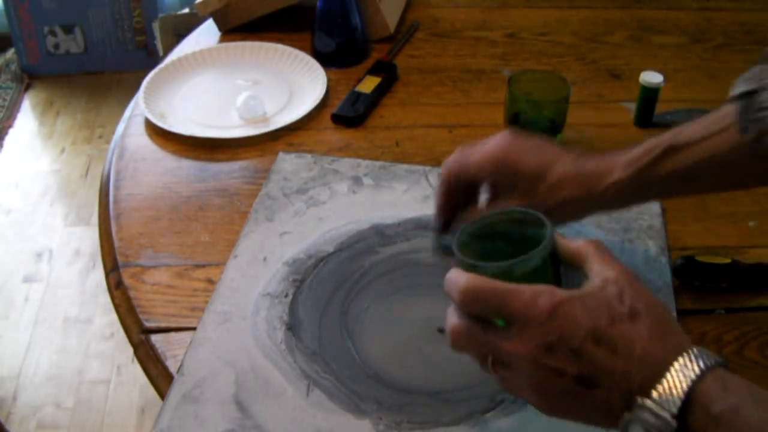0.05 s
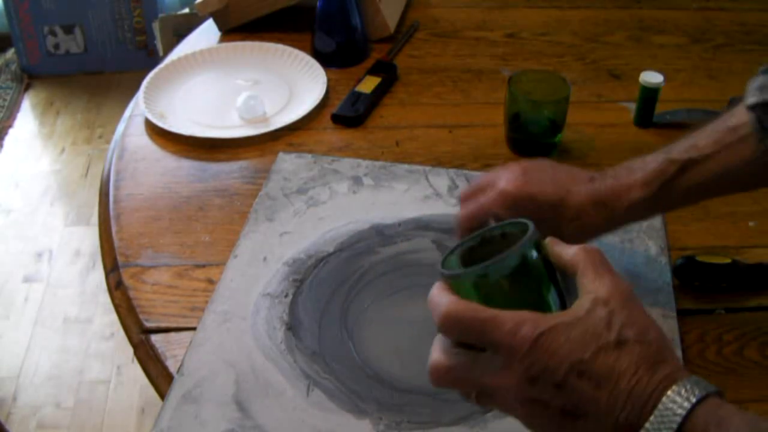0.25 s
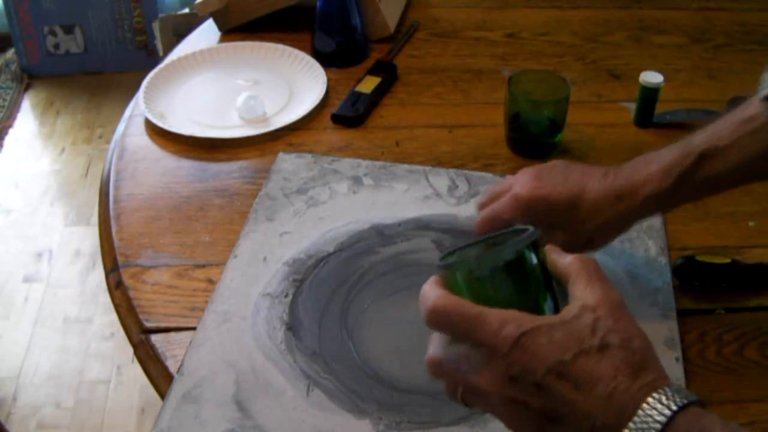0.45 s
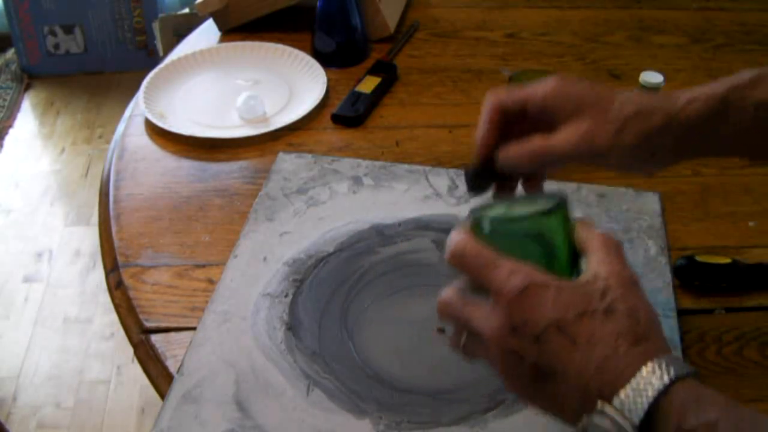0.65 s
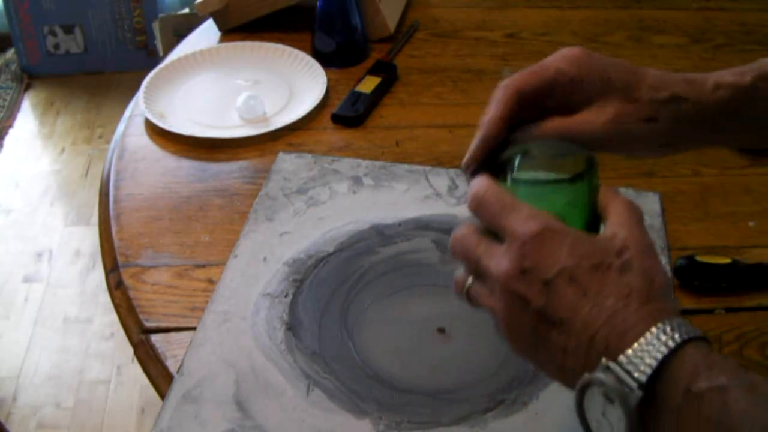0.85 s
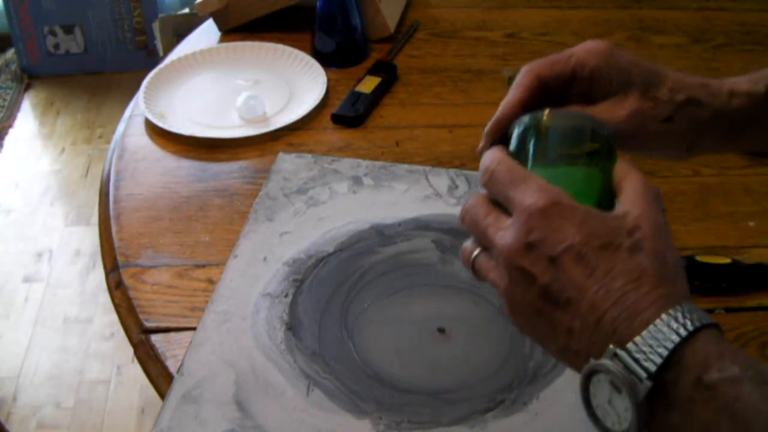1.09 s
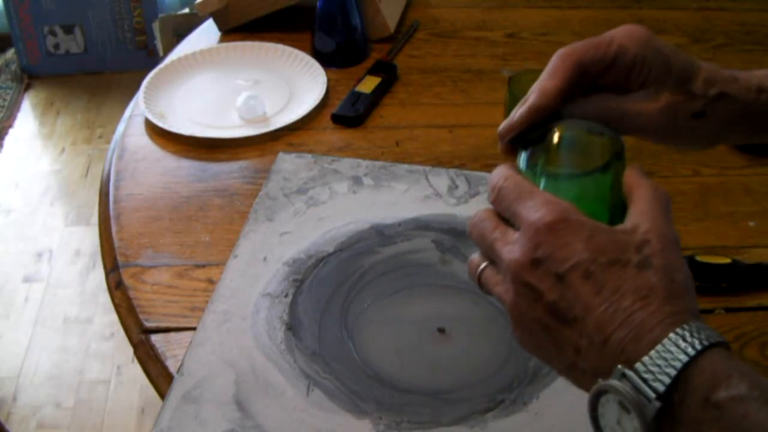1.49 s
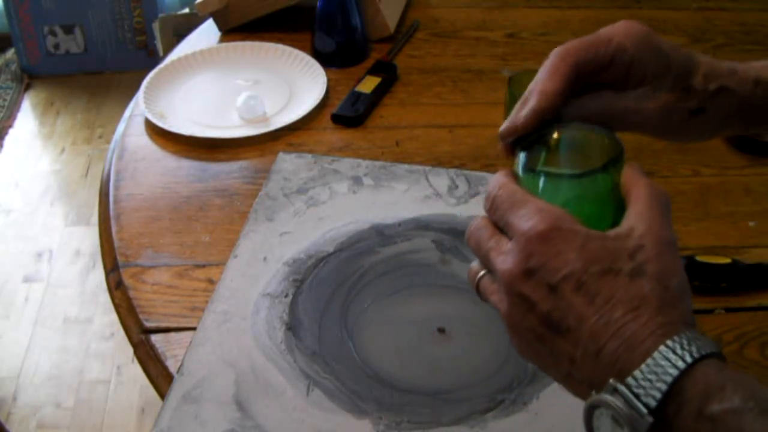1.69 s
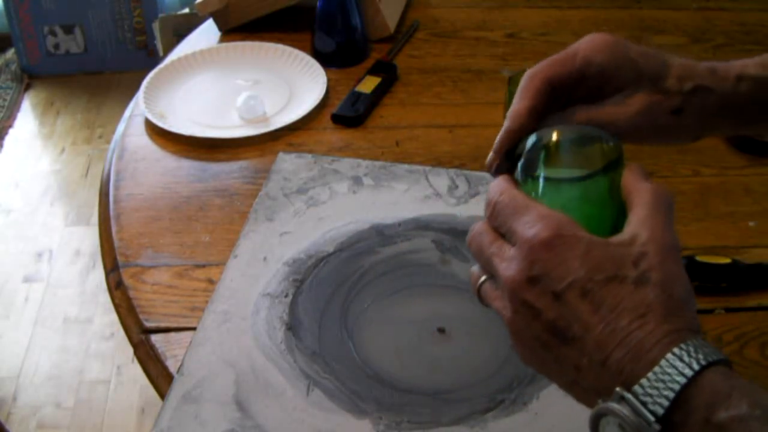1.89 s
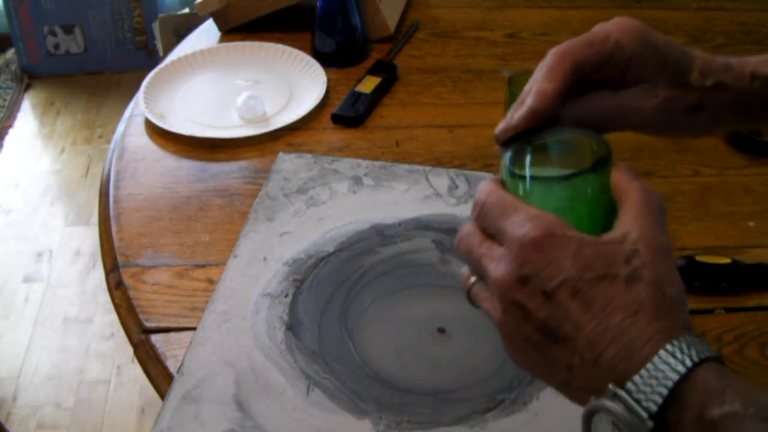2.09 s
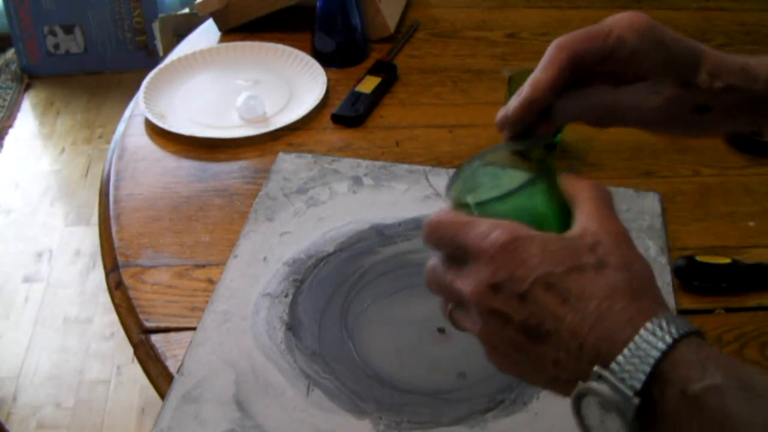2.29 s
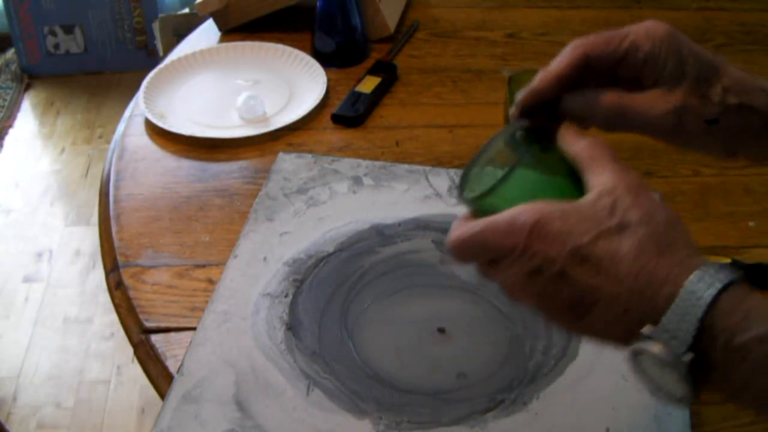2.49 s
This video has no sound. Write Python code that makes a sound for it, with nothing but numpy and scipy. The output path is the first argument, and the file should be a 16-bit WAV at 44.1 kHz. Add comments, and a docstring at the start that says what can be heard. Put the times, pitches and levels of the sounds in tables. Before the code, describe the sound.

Gritty scraping of an abrasive stone rubbed by hand on a glass tumbler's rim.

```python
"""An abrasive stone is rubbed by hand over the cut rim of a bottle-glass tumbler in a quiet workroom. Crushing
grit makes the scrape and sets stone and hand-damped glass ringing. A few broad strokes grind the flat of the
rim, then quick ones run along its edge, with grit dragging and ticking in between. The stone lands with a dull
knock for each run; room air and a low hum sit behind, their level sinking steadily."""
import sys
import numpy as np
from scipy import signal
from scipy.fft import rfft, irfft, next_fast_len
from scipy.io import wavfile

SR = 44100
rng = np.random.default_rng(int(sys.argv[2]) if len(sys.argv) > 2 else 0)


def wrap_up_sound(samples):
    """Save the sound to the file named by the first command line argument, as 16-bit audio."""
    columns = np.atleast_2d(samples).T
    # keep every value between -1 and 1, then stretch to whole-number steps
    tamed = np.clip(columns, -1, 1)
    steps = np.round(tamed * 32767).astype(np.int16)
    wavfile.write(sys.argv[1], SR, steps)


N = 116865
T = np.arange(N) / SR

# tone of the scrape on the rim's edge: (frequency [Hz], relative level [dB])
EDGE_SPECTRUM = [(200, -35), (500, -14.5), (1400, -13), (1900, -2.5), (3300, -1), (4400, 1.5), (5100, -2),
                 (6100, 0.5), (7000, 0), (8700, 3), (11500, 3.5), (12800, 6), (13800, -0.5), (15000, -2.5),
                 (16000, -23)]
# resonances of the glass as gripped for the edge: (frequency [Hz], width [Hz], relative gain [dB])
EDGE_RESONANCES = [(908, 92, 5.5), (1749, 69, 10.5), (3910, 143, 13.5), (4060, 160, -24), (5530, 150, 0.5),
                   (6750, 175, 12), (10540, 560, 2)]


def from_db(db):
    """Decibels to gain."""
    return 10 ** (np.asarray(db) / 20)


def fader(points):
    """Gain curve through (time [s], level [dB]) points."""
    return from_db(np.interp(T, *np.transpose(points)))


def unit_rms(x):
    """Scale to unit power."""
    return x / np.sqrt(np.mean(x ** 2) + 1e-20)


def at_hz(points, hz):
    """Read a table on a log-frequency axis."""
    freqs, values = np.transpose(points)
    return np.interp(np.log(hz + 1), np.log(freqs), values)


def drift(rate_hz):
    """Smooth random modulation at unit power."""
    pole = np.exp(-2 * np.pi * rate_hz / SR)
    return unit_rms(signal.lfilter([1], [1, -2 * pole, pole * pole], rng.standard_normal(2 * N))[N:])


def resonate(x, hz, width_hz):
    """One resonance with unity gain at its peak."""
    radius = np.exp(-np.pi * width_hz / SR)
    feedback = [1, -2 * radius * np.cos(2 * np.pi * hz / SR), radius ** 2]
    return signal.lfilter(np.array([1, 0, -1]) * (1 - radius ** 2) / 2, feedback, x)


def highs(x, above_hz):
    """The top end, split off without phase shift."""
    return signal.sosfiltfilt(signal.butter(2, above_hz, "high", fs=SR, output="sos"), x)


def coloured_stereo(pair, spectrum):
    """Shape two unrelated noises into unit-power stereo, narrow in the bass and wide in the treble."""
    # stereo image: (frequency [Hz], left-right correlation [ratio])
    image = [(100, 0.81), (1200, 0.87), (2500, 1), (4000, 0.79), (6000, 0.38), (7000, 0.53), (10000, 0.36),
             (15000, 0.1)]
    size = next_fast_len(N + SR // 10)
    hz = np.arange(size // 2 + 1) * SR / size
    alike = at_hz(image, hz)
    mid, side = rfft(pair, size) * from_db(at_hz(spectrum, hz)) * np.sqrt([1 + alike, 1 - alike])
    return unit_rms(irfft(np.array([mid + side, mid - side]), size)[:, :N])


def room_tone():
    """Room air with a wavering mains and motor hum, their level sinking together over time."""
    # hum partials: (frequency [Hz], level within the room tone [dB])
    partials = [(59, -17.5), (119, -9.5), (147, -8), (240, -19)]
    # tone of the air: (frequency [Hz], relative level [dB])
    air_spectrum = [(18, -51), (30, -26), (49, -13), (85, -19), (102, -12), (124, -5), (202, -13.5),
                    (344, -11.5), (443, -6.5), (478, -11), (836, -19), (1540, -21.5), (1700, -22),
                    (2090, -25.5), (3210, -26.5), (11200, -30), (13000, -31)]
    # the air's treble against its bass: (time [s], level [dB])
    hiss_ride = [(0, 0), (.19, -1), (.85, -4), (2.6, 0)]
    # fade of air and hum: (time [s], level [dB])
    fade = [(0.0, -26.5), (0.24, -31), (0.52, -31.5), (0.65, -31.5), (0.85, -33), (1.31, -38.5),
            (2.41, -39.5), (2.65, -40.5)]
    hum = 0
    for hz, db in partials:
        amplitude = np.sqrt(2) * from_db(db + 2.8 * drift(1.36))
        hum += amplitude * np.sin(2 * np.pi * (hz * T + rng.random()) + 0.1 * drift(1.7))
    air = from_db(-0.5) * coloured_stereo(rng.standard_normal((2, N)), air_spectrum)
    air = signal.sosfilt(signal.butter(12, 12900, fs=SR, output="sos"), air)
    air += (fader(hiss_ride) - 1) * highs(air, above_hz=1750)
    return fader(fade) * (air + hum) * from_db([[-1.1], [1.1]])  # leans right


def room_reverb(x, t60_s=0.53, predelay_s=.004, crossfeed=0.25):
    """The walls return a diffuse, slightly dull tail, different at each ear."""
    age = T[:SR]
    tail = rng.standard_normal((2, SR)) * from_db(-60 * age / t60_s) * (age > predelay_s)
    tail /= np.sqrt(np.sum(tail ** 2, axis=1, keepdims=True))
    wet = signal.fftconvolve(x, tail, axes=1)[:, :N]
    wet = wet + crossfeed * wet[::-1]
    return from_db(-9.5) * signal.sosfilt(signal.butter(1, 7400, fs=SR, output="sos"), wet)


def reflections(x, span_s=0.0065, taps=6):
    """The direct sound plus reflections off hands and table, drawn anew for each stroke."""
    out = x.copy()
    tap_gain = from_db(-7.5) / np.sqrt(taps)
    for share, polarity in rng.uniform([.1, -1], 1, (taps, 2)):
        out += np.sign(polarity) * tap_gain * np.roll(x, int(share * span_s * SR), axis=1)
    return out


def knocks():
    """The landing stone sets a few low, quickly damped modes ringing."""
    # landings: (time [s], level [dB])
    landings = [(.217, -21.5), (0.992, -23.5)]
    # body of the knock: (frequency [Hz], width [Hz], relative level [dB])
    modes = [(503, 45, -5), (940, 150, -3), (1350, 120, -1), (1740, 90, -1.5)]
    out = 0
    for start, level_db in landings:
        age = np.maximum(T - start, 0)
        for hz, width, db in modes:
            out += from_db(level_db + db) * np.exp(-np.pi * width * age) * np.sin(2 * np.pi * hz * age)
    return out


def grit(spectrum, grains_per_s=1800, spread_db=2.6, grain_s=.0005, powder=.7):
    """Grains of uneven size each crush in a tiny burst over a hiss of powder, while the stone judders."""
    hits = rng.random(N) < grains_per_s / SR
    sizes = hits * from_db(spread_db * np.minimum(rng.exponential(1, N), 4))
    crush_power = signal.lfilter([1], [1, -np.exp(-2 / (grain_s * SR))], sizes ** 2 + 1e-18)
    judder = from_db(-0.3 * drift(rate_hz=108))
    force = np.sqrt(powder ** 2 + crush_power / crush_power.mean()) * judder
    return coloured_stereo(force * rng.standard_normal((2, N)), spectrum)


def glass_ring(force, modes):
    """The glass rings in its resonances under the scraping force."""
    return sum(from_db(db) * resonate(force, hz, width) for hz, width, db in modes)


def drag_and_ticks(tick_decay_s=0.0023):
    """The stone rests lightly on the edge, dragging and catching on single grains."""
    # light drag between strokes: (time [s], relative level [dB])
    drag_ride = [(.94, -58), (.97, -26.5), (1.06, -28), (1.23, -18), (1.38, -26.5), (1.62, -30),
                 (1.74, -35.5), (1.86, -26.5), (2.04, -30.5), (2.25, -34.5), (2.40, -24), (2.45, -69)]
    # grains catching: (time [s], relative level [dB])
    catches = [(.351, -21), (0.943, -35), (.968, -29), (1.144, -16), (1.23, -19), (1.772, -6.5),
               (1.803, -12), (2.252, -16), (2.286, -13), (2.313, -13)]
    drag = from_db(-4) * fader(drag_ride)
    ticks = 0
    for start, db in catches:
        ticks += from_db(db - 6) * (T >= start) * np.exp(-np.abs(T - start) / tick_decay_s)
    scrape = grit(EDGE_SPECTRUM)
    ring_drive = from_db(-5.5) * drag + from_db(-13) * ticks
    return scrape * (drag + ticks) + glass_ring(scrape * ring_drive, EDGE_RESONANCES)


def rub(strokes, spectrum, modes, grip_detune=0.0036):
    """Each stroke presses in, holds and lets go; stone and glass ring, the grip nudging the glass's pitch."""
    scrape = grit(spectrum)
    treble = highs(scrape, above_hz=6640)
    out = 0
    for start, attack, hold, release, first_db, last_db, treble_db, ring_db, stone_hz, stone_db in strokes:
        corners = start + np.cumsum([0, attack, hold, release])
        pressure = np.interp(T, corners, [0, from_db(first_db), from_db(last_db), 0])
        stroke = pressure * (scrape + (from_db(treble_db) - 1) * treble) + 1e-12 * scrape
        gripped = [(hz * (1 + grip_detune * rng.uniform(-1.2, 1)), width, db) for hz, width, db in modes]
        stone_ring = from_db(stone_db) * resonate(stroke, stone_hz, width_hz=220)
        out += reflections(stroke) + stone_ring + from_db(ring_db) * glass_ring(stroke, gripped)
    return out


def flat_grinding():
    """Broad strokes grind the flat of the rim."""
    # strokes: (start [s], attack [s], hold [s], release [s], hold start level [dB], hold end level [dB],
    # treble gain [dB], glass ring gain [dB], stone pitch [Hz], stone ring gain [dB])
    strokes = [ (.198, 0.0032, 0.014, .004, -26, -26.5, -9, -16, 4200, -13),
               (.214, .004, 0.0072, .006, -19, -15, -5.5, -18, 3470, 5.5),
               (.227, 0.003, 0.0044, 0.033, -25, -20.5, -3, -23, 6940, 3),
               (.263, 0.012, 0.053, 0.039, -20.5, -20, 0.5, 3.5, 2300, 3),
               (.354, 0.022, .053, 0.053, -22, -18.5, -5, -18, 2890, -0.5),
               (.470, 0.033, 0.099, 0.043, -15, -20.5, -5, 4.5, 2800, -35),
               (.630, 0.017, 0.037, .12, -30, -35.5, -9, -8, 1880, 1)]
    # tone of the scrape on the flat: (frequency [Hz], relative level [dB])
    spectrum = [(150, -34), (400, -11.5), (900, -9.5), (1800, -6.5), (2800, -3), (5000, -3), (7200, 0.5),
                (9000, -2.5), (13000, -1), (15000, -20), (16000, -30)]
    # resonances of the glass in this grip: (frequency [Hz], width [Hz], relative gain [dB])
    modes = [(1414, 70, -1), (2234, 40, -2), (3108, 80, -5), (4750, 90, -6), (5290, 190, -3),
             (5680, 40, -7), (9813, 50, -2)]
    return from_db(8) * rub(strokes, spectrum, modes)


def edge_grinding():
    """Quick, bright strokes along the edge make the hand-damped glass ring."""
    # strokes: (start [s], attack [s], hold [s], release [s], hold start level [dB], hold end level [dB],
    # treble gain [dB], glass ring gain [dB], stone pitch [Hz], stone ring gain [dB])
    strokes = [ (.987, 0.0066, 0.0057, 0.0028, -15, -15, 3.5, -12, 5770, 17.5),
               (1.002, 0.0031, 0.0017, .008, -13, -16.5, -4, 3, 8500, 7),
               (1.070, 0.0053, 0.039, 0.0057, -14, -15.5, -0.5, 1, 8500, 2),
               (1.135, 0.034, 0.024, .008, -10.5, -24, -1, -1.5, 4200, 13),
               (1.184, 0.0036, 0.016, 0.0069, -22, -13.5, -2, 6.5, 6780, 10),
               (1.238, 0.014, 0.089, 0.015, -10.5, -12, -1.5, -0.5, 10100, -3),
               (1.393, 0.015, 0.041, 0.0096, -14, -21.5, 1, 1.5, 6860, 1),
               (1.495, 0.019, 0.056, 0.035, -16.5, -14, -1.5, -0.5, 4450, -12),
               (1.647, 0.01, 0.0048, 0.0076, -15.5, -12, -6, -1.5, 11050, 11),
               (1.668, 0.0097, 0.01, 0.012, -13.5, -25, -6, -3, 5640, -16),
               (1.756, 0.026, 0.048, 0.016, -17, -15, -4.5, 0, 11030, 8),
               (1.879, 0.014, 0.047, 0.022, -13, -17, -3.5, 1, 11000, -9),
               (1.999, 0.0057, 0.021, 0.0058, -18.5, -16.5, -5.5, 1, 12600, -8),
               (2.069, 0.013, 0.11, 0.029, -13.5, -16.5, -1, -1.5, 6800, -18),
               (2.310, 0.022, 0.048, 0.012, -16, -13.5, -2.5, -1.5, 11800, 1)]
    return from_db(-1) * rub(strokes, EDGE_SPECTRUM, EDGE_RESONANCES)


def scene():
    """Stone on glass: the opening flat strokes have a louder room tail, the edge strokes sound drier."""
    flat = flat_grinding()
    edge = edge_grinding() + drag_and_ticks()
    landing = knocks()
    reverb_send = from_db(2.5) * flat + from_db(-1.5) * edge + landing
    return flat + edge + landing + room_reverb(reverb_send) + room_tone()


def record(dry, ceiling=1.15):
    """The microphone has a narrow dip in the treble; the highest peaks are rounded and the top is cut."""
    notched = dry - 0.59 * resonate(dry, hz=7900, width_hz=330)
    rounded = notched / (1 + (notched / ceiling) ** 4) ** .25
    return signal.sosfilt(signal.ellip(10, .2, 80, 15200, fs=SR, output="sos"), rounded)


dry = scene()
out = record(dry)
wrap_up_sound(out)
```